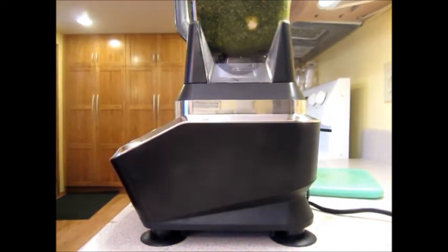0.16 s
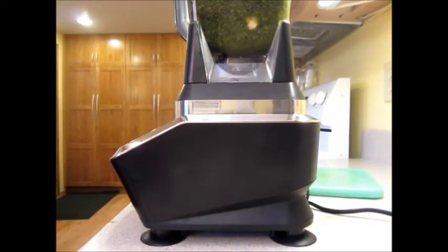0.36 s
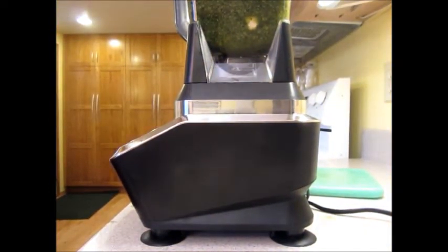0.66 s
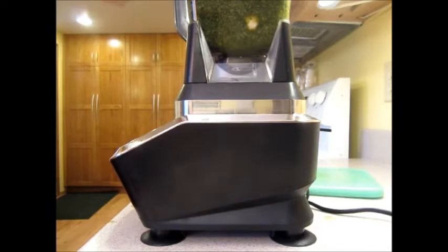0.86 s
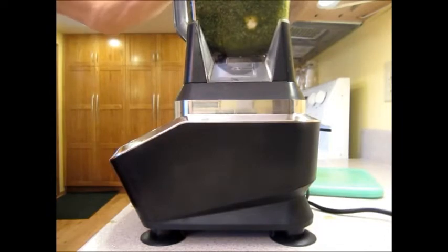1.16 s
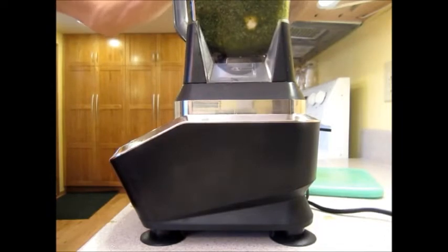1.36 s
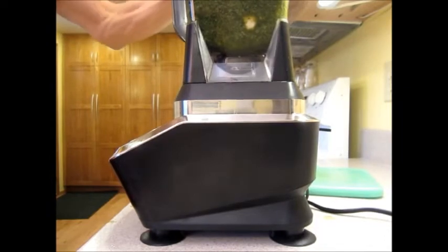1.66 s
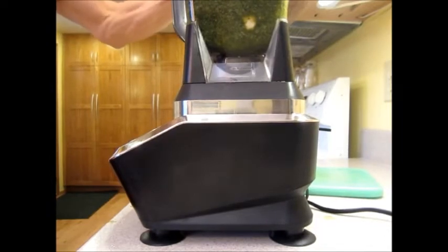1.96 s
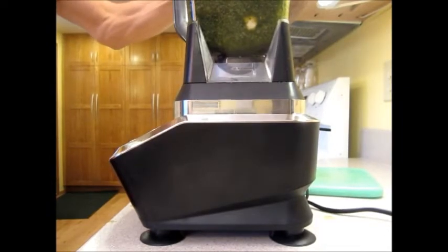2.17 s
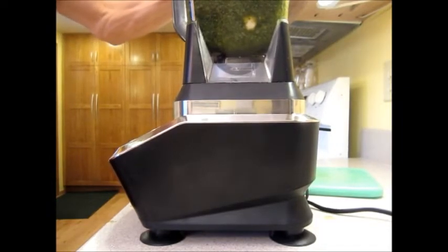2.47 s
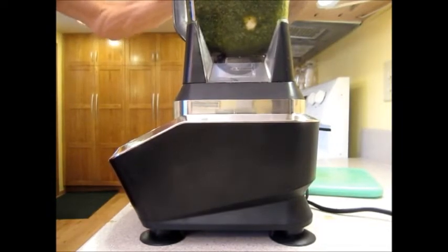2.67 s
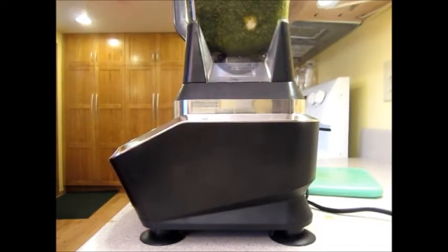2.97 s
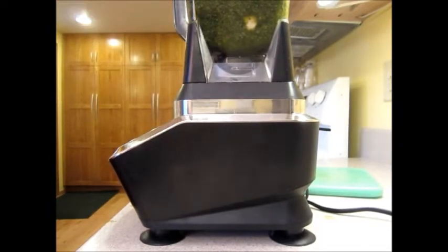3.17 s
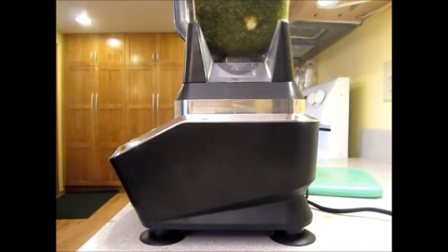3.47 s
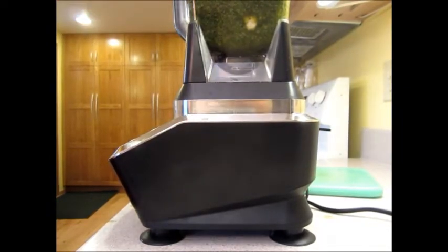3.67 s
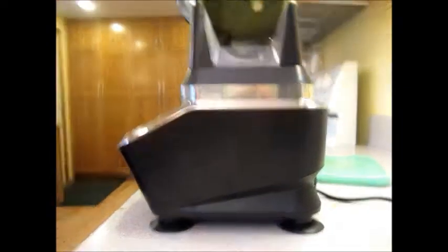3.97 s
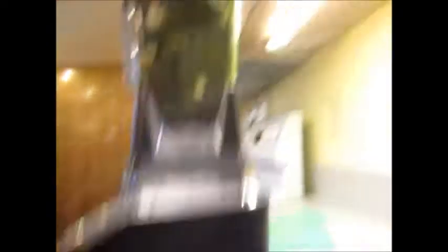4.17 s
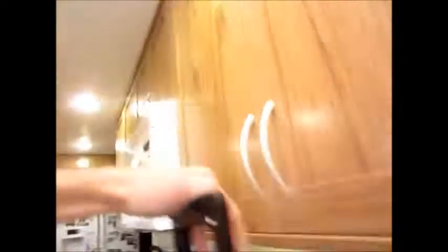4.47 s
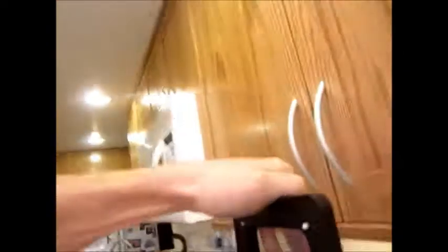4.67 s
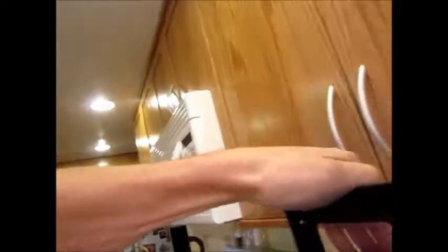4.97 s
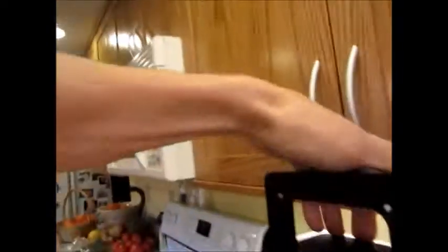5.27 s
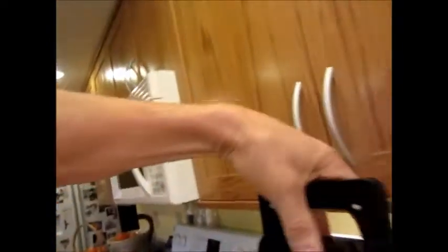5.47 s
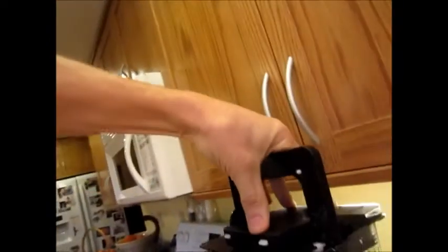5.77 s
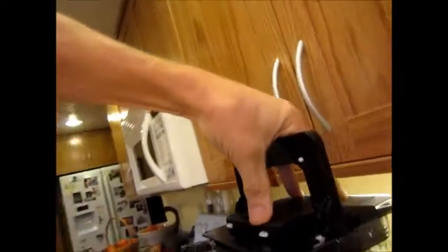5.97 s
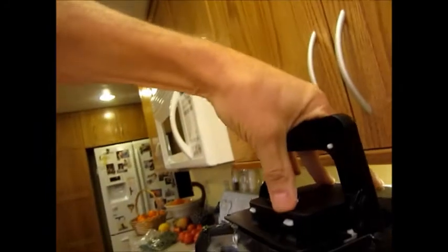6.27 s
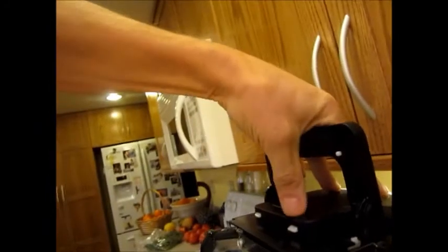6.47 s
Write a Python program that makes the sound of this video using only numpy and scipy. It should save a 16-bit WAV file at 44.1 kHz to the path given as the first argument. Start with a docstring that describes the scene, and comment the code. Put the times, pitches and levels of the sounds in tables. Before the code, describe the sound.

A silent blender's full plastic jar is handled in a hard, reflective kitchen, heard close over soft low hum and hiss, with a barely audible high whine until 4.1 s. A small tick precedes a loud snap at 0.12 s. From 0.4 to 1.5 s, hollow knocks and rattles crowd together with gritty, swelling rubs and a hollow resonance, the biggest clack at 1.07 s. Smaller knocks and low thuds continue, with another loud clack at 2.16 s, then sparser taps and a sharp crack at 2.97 s. Soft rustling follows. From 3.7 to 4.4 s fingers grip and lift the microphone: dry scuffs, low bumps, snaps and a tiny squeak at 4.2 s. A heavy clack lands at 4.47 s, then near quiet. Drier, brighter lid snaps come around 5.35 to 5.4 s, the loudest, and at 6.0 s, ending with faint small clicks around 6.45 s.

```python
"""A hand works a plastic lid and tamper on the full jar of a silent blender in a hard kitchen: knocks and snaps
are noise bursts that ring the jar's modes and a room tail, rubbing is gritty noise that swells with each push.
Brief dry swells of shaped noise run from a tick at 0.108 s on, densest from 3.7 to 4.4 s, where one squeaks;
there fingers grip and lift the microphone, and the knocks turn drier. Low thuds and rumble reach the microphone
over hum and hiss; a faint high tone stops at 4.1 s."""
import sys
import numpy as np
from scipy.fft import rfft, irfft, next_fast_len
from scipy.io import wavfile
from scipy.ndimage import uniform_filter1d, map_coordinates

SR = 44100
rng = np.random.default_rng(int(sys.argv[2]) if len(sys.argv) > 2 else 0)


def waveform_to_disk(signal):
    """Save audio, clipped to [-1, 1], as 16-bit WAV at the path in sys.argv[1]."""
    frames = np.transpose(np.atleast_2d(signal))
    scaled = np.clip(frames, -1, 1) * 32767
    samples = np.round(scaled).astype(np.int16)
    wavfile.write(sys.argv[1], SR, samples)


N = 291921  # samples

# resonances of jar and lid: pitch_hz [Hz], width_hz [Hz], strength_db [dB]
JAR_MODES = [(460, 39, 1), (550.5, 31, -5.5), (647.4, 65, 0), (740, 51, -3.5), (924, 71, -4),
             (1154, 110, -2.5), (1310, 87, 0), (1427, 67, -1), (1580, 98, -4.5), (1816, 56, -7),
             (2410, 260, -8.5), (2786, 120, -2.5), (3160, 240, -4), (3614, 70, -7.5), (4300, 620, -4),
             (4920, 240, -8), (5464, 200, -9), (5790, 110, -6), (6800, 130, -13), (8470, 230, -12.5),
             (9340, 190, -13.5), (10000, 180, -9.5), (11100, 240, -13.5)]
# boom, wall, snap and tick of a contact: centre_hz [Hz], room_t60_s [s to decay by 60 dB]
CONTACT_PARTS = [(600, 0.37), (1500, .36), (4200, 0.31), (10000, 0.2)]


def amp(db):
    """Gain of a level in dB."""
    return 10 ** (np.asarray(db) / 20)


def unit(x):
    """Scaled to rms 1."""
    return x / np.sqrt(np.mean(x ** 2) + 1e-20)


def along(points, hz):
    """Value at each frequency, read between (Hz, value) points on a log axis."""
    f, v = np.transpose(points)
    return np.interp(np.log(hz + 1), np.log(f + 1), v)


def filtered(x, response):
    """x shaped along its last axis by a complex response of frequency."""
    n = x.shape[-1]
    m = next_fast_len(n + 2048)
    spectrum = rfft(x, m) * response(np.fft.rfftfreq(m, 1 / SR))
    return irfft(spectrum, m)[..., :n]


def wobble(rate):
    """A smooth random curve through rate knots a second."""
    knots = rng.standard_normal(int(N * rate / SR) + 4)
    return map_coordinates(knots, [np.arange(N) * rate / SR])


def gritty(size, grit_db):
    """Noise whose samples scatter in size, as many tiny slips do."""
    slip_size = amp(grit_db * rng.standard_normal(size))
    return unit(rng.standard_normal(size) * slip_size)


def narrow(centre_hz, width_hz):
    """A fuzzy tone of rms 1: noise in a narrow bell around one pitch."""
    return unit(filtered(rng.standard_normal(N), lambda hz: np.exp(-((hz - centre_hz) / width_hz) ** 2)))


def ringing(hz, extra_db, broad_db):
    """Response of the jar: its resonances, each at an extra strength, over a flat response."""
    total = amp(broad_db)
    for k, (pitch_hz, width_hz, db) in enumerate(JAR_MODES):
        damping = 1j * hz * width_hz
        mode = damping / (pitch_hz ** 2 - hz ** 2 + damping)
        total = total + amp(db + extra_db[..., k, None]) * mode
    return total


def part(hz, k):
    """Share of the spectrum that belongs to part k; bass and the extreme treble fall away."""
    peaks = [(centre_hz, i == k) for i, (centre_hz, _) in enumerate(CONTACT_PARTS)]
    return along([(300, 0.006)] + peaks + [(15500, 0.014)], hz)


def near_modes(pitch_hz):
    """Closeness, 0 to 1, of every jar mode to each contact's pitch."""
    reach_oct = 0.079
    octaves = np.log2(np.transpose(JAR_MODES)[0] / pitch_hz[:, None])
    return np.exp(-(octaves / reach_oct) ** 2)


def knocks():
    """Each contact is a short noise burst that rings the jar, and the kitchen answers with a diffuse tail."""
    # contacts: start_s [s], snap_db [dB, peak before the output gain below],
    # boom, wall and tick [each dB over the snap], low_hz and high_hz [Hz], length_ms [ms to decay by 60 dB]
    contacts = [(0.0332, -54, 7.5, 18, -28, 1310, 1730, 13), (0.063, -47.5, 12.5, 11.5, -20, 550, 1640, 21),
                (.1214, -8, -8, 5.5, -19.5, 1580, 3036, 19), (0.4169, -31.5, -2, 6.5, -11, 553, 1820, 13),
                (0.4417, -35.5, 5, 8, -16, 1470, 2240, 30), (.4918, -45.5, 22, 19.5, -18, 1345, 1840, 18),
                (.544, -43, 7, 4.5, 3, 633, 1850, 20), (0.6005, -40.5, 10, 14, -15, 635, 1720, 21),
                (0.6426, -25.5, 8, 12.5, -14, 1275, 3060, 19),
                (0.6592, -33.5, 18.5, 13.5, -5, 620, 1710, 23), (0.6914, -28.5, 9, 13, -38, 1196, 1760, 22),
                (0.7101, -37.5, 14, 13, -3, 557, 1700, 16), (.7414, -37, 0, -8, -12, 600, 1710, 14),
                (0.776, -28.5, 9, 7.5, -26, 1310, 1870, 24), (.8535, -42.5, 11.5, -24, -19, 630, 1710, 16),
                (.9033, -35, 6, -27, -3, 550, 1720, 16), (0.9247, -24, -2.5, -5, -9, 460, 4300, 19),
                (1.046, -20, 6, 1, -7, 696, 4300, 36), (1.067, -8, -3.5, 1, -19, 1096, 1820, 13),
                (1.0853, -24.5, -5, 11, -28, 1170, 1710, 14), (1.099, -23, -7, 7.5, -11, 1190, 1710, 17),
                (1.1205, -35, 11, -4.5, -8, 409, 2710, 16), (1.212, -24.5, 8.5, -1.5, -15.5, 610, 2630, 40),
                (1.261, -28.5, 5.5, 3.5, -9, 1300, 2000, 31),
                (1.3743, -35.5, -11, 4.5, -18, 1530, 1770, 15),
                (1.393, -30, -20, -0.5, -13, 1700, 1760, 16), (1.4055, -32, -19, -7, -2, 1200, 3940, 19),
                (1.511, -41.5, 1, -4, 2.5, 454, 3830, 24), (1.6023, -43, -17, -16, 0, 1220, 4150, 14),
                (1.6196, -43, 6, 6, 0, 468, 1880, 25), (1.667, -33, 4, 7.5, -5, 458, 1720, 27),
                (1.6916, -26.5, 4, 0.5, -8, 730, 3340, 21), (1.7994, -37, 8, 13.5, -8, 1266, 1870, 27),
                (1.82, -33.5, 11.5, 10, 1, 460, 2890, 24), (1.9139, -43.5, 9.5, -13, -1.5, 463, 4380, 18),
                (2.157, -8, -5.5, -9.5, -15.5, 600, 2620, 27),
                (2.1753, -17.5, -22, -29, -40, 460, 4600, 18), (2.3156, -27, 1, 9, -14, 1270, 2630, 26),
                (2.3434, -27.5, 7, 8.5, -37, 1580, 1800, 22), (2.3611, -36, 6.5, 1, -9, 1550, 2480, 36),
                (2.401, -37.5, -17, -33, -0.5, 444, 4340, 28), (2.4673, -38, -14, -17, -12, 439, 4400, 18),
                (2.575, -43, 13, 13, -31, 930, 924, 28), (2.841, -33, -30.5, -11, -2, 641, 4500, 14),
                (2.9497, -31.5, -40, -1, -24, 1320, 4330, 21),
                (2.9733, -7, -14, -6.5, -14.5, 1400, 4970, 13.6), (3.25, -40, 6.5, 4, -9, 470, 924, 35),
                (3.9805, -18.5, -11, -8, -12, 1240, 3350, 9.9), (4.014, -41.5, -2, -4, 0, 439, 1700, 14),
                (4.1114, -26, -33, -21, -3.5, 1310, 4830, 19), (4.2006, -9, -15, -18, -14, 527, 2790, 9.5),
                (4.2819, -19.5, -5.5, -7.5, -6, 1060, 2330, 12), (4.3114, -29, 4, -19, -20, 816, 3980, 20),
                (4.3727, -44, 13.5, -11, -29, 460, 2990, 8.5), (4.469, -8, 1.5, 6, 0.5, 610, 2340, 15.7),
                (5.0833, -49.5, 13.5, 2, -14, 726, 3250, 16), (5.1126, -46, 6, 6.5, -4, 677, 2150, 13),
                (5.2105, -38, 9.5, -1.5, -7, 477, 2400, 14), (5.2335, -34.5, 0.5, -5, -29, 744, 5430, 17),
                (5.3267, -24, -13.5, 2, -15, 1107, 3090, 17.5),
                (5.351, -17, -4.5, -5.5, -8, 1590, 5740, 11),
                (5.3844, -1.5, -26, -13, -11.5, 1650, 5320, 14.3),
                (5.3914, -10.5, -20, -2.5, -13.5, 1580, 5900, 22),
                (5.7506, -59.5, 22, 15.5, -24, 734, 1770, 21), (5.963, -40, -5, -10.5, -8, 458, 5300, 25),
                (6.0002, -5.5, -14, 0, -4.5, 1680, 5500, 13.7),
                (6.32, -48.5, -17, -18, -10, 1430, 5680, 25), (6.351, -59.5, 18, 16, -16, 1310, 1940, 16),
                (6.392, -46, -2, -7, -26, 473, 4920, 11), (6.417, -45.5, -11, -17, -9, 441, 5640, 14),
                (6.4427, -46, 11, 5.5, -8.5, 930, 3020, 23),
                (6.4624, -25.5, -14, -3, -14.5, 1320, 3160, 20),
                (6.576, -49.5, -23, -20, 7, 1190, 6720, 13)]
    start_s, snap_db, boom, wall, tick, low_hz, high_hz, length_ms = np.transpose(contacts)
    count = len(start_s)
    lift_s, held_s = 3.7, 4.4  # fingers close on the microphone and lift it; then it is held in the air

    # room over direct sound for a snap of -29 dB: on the counter, lifted, and for the dry taps of gripping fingers
    counter_wet_db, lifted_wet_db, grip_wet_db = -5, -11, -16.5
    wet_db = np.where(start_s < lift_s, counter_wet_db, lifted_wet_db)
    wet_db = np.where((start_s > lift_s) & (start_s < held_s), grip_wet_db, wet_db)
    wet_db = wet_db - 0.0306 * (snap_db + 29)  # hard snaps stand further out of the room

    # a longer contact also rises more slowly
    t = np.arange(3072) / SR
    life_s = length_ms[:, None] / 1000
    envelope = amp(-60 * t / life_s) * (1 - np.exp(-t / (0.066 * life_s)))
    burst = rng.standard_normal((count, len(t))) * envelope

    # the struck spot favours the modes near its two pitches
    favour_db = 15 * np.maximum(near_modes(low_hz), near_modes(high_hz))
    favour_db += 3 * rng.standard_normal((count, len(JAR_MODES)))
    lead = 64  # samples of space before the contact
    padded = np.pad(burst, ((0, 0), (lead, 1500)))
    rung = filtered(padded, lambda hz: ringing(hz, favour_db, broad_db=-10))

    # the room mixes all directions, which blurs the modes a little
    late = np.arange(18000) / SR
    room_noise = rng.standard_normal((count, len(late)))
    diffuse = filtered(room_noise, lambda hz: ringing(hz, 0.7 * favour_db, broad_db=-8))
    buildup = 1 - np.exp(-late / 0.0019)  # echoes gather over a few milliseconds

    rows = np.zeros((count, len(late)))
    for k, over_db in enumerate([boom, wall, 0 * start_s, tick]):
        direct = filtered(rung, lambda hz: part(hz, k))
        peak = uniform_filter1d(np.abs(direct), size=40).max(1, keepdims=True)  # of a 0.9 ms average
        direct *= amp(snap_db + over_db)[:, None] / peak
        room_t60_s = CONTACT_PARTS[k][1]
        tail = filtered(diffuse, lambda hz: part(hz, k)) * amp(-60 * late / room_t60_s) * buildup
        tail_gain = amp(wet_db) * np.linalg.norm(direct, axis=1) / np.linalg.norm(tail, axis=1)
        rows += tail * tail_gain[:, None]
        rows[:, :direct.shape[1]] += direct

    out = np.zeros(N + SR)
    for start, row in zip(np.round(start_s * SR).astype(int) - lead, rows):
        out[start:start + len(row)] += row
    return amp(-7.5) * out[:N]


def pushes():
    """Level curves in dB of drag, rumble and hum: each push rises and falls at a steady rate in dB."""
    # the hand bears down on the jar or grips the microphone: middle_s [s], drag_db and rumble_db [dB before trim],
    # hum_db [dB, hollow base], rise_s [s to rise by 10 dB; below 0 swaps rise and fall, 0 makes no push]
    push_table = [(.48, -53, -55, -62, 0.9), (.66, -29, -50, -39.5, 0.0642), (.77, -37, -55, -42, .05),
                  (.93, -39, -52, -42, 0.03), (1.07, -33, -47, -41, 0.02),
                  (1.119, -29.5, -34.5, -39, 0.0136), (1.27, -42.5, -41, -48, 0.07),
                  (1.44, -49, -49, -56.5, 0.13), (1.53, -62, -46, -51, .04), (1.69, -31, -38, -36, -0.006),
                  (1.821, -44, -35, -40, 0.02), (1.97, -49.5, -45.5, -53.5, 0.19),
                  (2.18, -43, -37, -47, .03), (2.36, -41.5, -37, -48, 0.0232), (2.58, -62, -57.5, -64, .06),
                  (2.99, -48.5, -48.5, -63, 0.16), (3.13, -45, -63, -75, 0.12),
                  (3.25, -47.5, -58, -57, 0.11), (3.76, -58, -44.5, -90, 0.09),
                  (3.89, -52, -39.5, -95, 0.06), (3.98, -44.5, -38, -90, 0.03),
                  (4.04, -45, -37.5, -90, 0.05), (4.14, -43.5, -44, -90, 0.11),
                  (4.29, -53, -37.5, -90, 0.0566), (4.38, -47, -45.5, -90, 0.09),
                  (4.48, -40, -46, -90.5, 0.09), (5.219, -48, -42, -90, 0), (5.36, -41, -41, -90, .02),
                  (5.5, -53.5, -70, -90, 0.15), (5.78, -70, -48, -90, .025), (6.02, -42.5, -48, -90, 0.04)]
    release = 1.31  # a push lets go this much more slowly than it comes
    t = np.arange(0, N, 64) / SR
    middle_s, *levels, rise_s = np.transpose(push_table)[..., None]
    fall_db = 10 * np.maximum((middle_s - t) / rise_s, (t - middle_s) / (release * rise_s))
    return [np.interp(np.arange(N) / SR, t, (db - fall_db).max(0)) for db in levels]


def rubbing():
    """The hand drags on the jar, its contents rustle, and pushes travel to the microphone as rumble."""
    # level of the rustle: time_s [s], level_db [dB before trim]
    rustle_level = [(0, -55), (.4, -64.5), (.77, -47.5), (1.01, -56.5), (1.25, -49.5), (1.7, -57.5),
                    (1.95, -52.5), (2.5, -56.5), (2.9, -56.5), (3.11, -47.5), (3.35, -60), (3.65, -66.5),
                    (3.89, -49.5), (4.48, -49.5), (4.7, -69), (5.07, -61), (5.4, -52), (5.6, -55),
                    (5.75, -66.5), (5.95, -58), (6.03, -53), (6.16, -72), (6.62, -64)]
    # spectrum of the rustle: pitch_hz [Hz], density_db [relative dB per Hz]
    rustle_spectrum = [(710, -31.5), (1200, -3), (1610, 0.5), (3070, -2.5), (4930, -0.5), (9420, -11.5),
                       (11300, -11.5), (15800, -27.5)]
    # spectrum of the rumble: pitch_hz [Hz], density_db [relative dB per Hz]
    rumble_spectrum = [(12, -45.5), (20, -15.5), (48, -3), (119, -3.5), (208, -8), (252, -11.5), (400, -8),
                       (520, -27.5), (880, -120)]

    push_drag_db, push_rumble_db, hum_db = pushes()
    rustle_db = np.interp(np.arange(N) / SR, *np.transpose(rustle_level))
    # between pushes the resting hand drags and rumbles along with the rustle
    drag_db = np.maximum(push_drag_db, rustle_db - 4)
    rumble_db = np.maximum(push_rumble_db, rustle_db - 5.5)

    even = np.zeros(len(JAR_MODES))  # dB, no mode favoured
    drag = filtered(gritty(N, grit_db=4),
                    lambda hz: ringing(hz, even, broad_db=-9) * (part(hz, 0) + 0.7 * part(hz, 1)))
    rustle = filtered(gritty(N, grit_db=5), lambda hz: amp(along(rustle_spectrum, hz)))
    rumble = filtered(rng.standard_normal(N), lambda hz: amp(along(rumble_spectrum, hz)))
    base_hum = amp(hum_db + 4 * wobble(22)) * narrow(centre_hz=459.4, width_hz=37.5)

    jerk = wobble(30)  # drag and rustle jerk together
    lumps_db = 4 * wobble(20)  # pushes come in separate lumps
    # the last number of each gain is its trim in dB
    drag = amp(drag_db + 3.9 * jerk - 2.0) * unit(drag)
    rustle = amp(rustle_db + 3.3 * jerk + 0.7 * wobble(100) + 1.1) * unit(rustle)
    rumble = amp(rumble_db + lumps_db - 1.0) * unit(rumble)
    return drag + rustle + rumble + base_hum


def thuds():
    """Knocks carried through counter or hand: each is one low, quickly dying sine."""
    # thuds: start_s [s], level_db [dB before rise and decay], pitch_hz [Hz]
    thud_table = [(1.088, -32, 290), (1.122, -36, 130), (1.25, -33, 144), (1.427, -33, 113),
                  (1.692, -34, 80), (1.82, -27.5, 130), (2.158, -27, 196), (2.347, -27, 140),
                  (2.973, -40, 180), (3.748, -36, 88), (3.888, -28, 129), (3.983, -27.5, 114),
                  (4.04, -35, 100), (4.155, -33, 340), (4.2, -33, 330), (4.282, -27, 207),
                  (4.314, -31, 180), (4.372, -36, 200), (4.469, -27, 282), (5.209, -32, 166),
                  (5.351, -33.5, 196), (5.758, -37, 75), (6.001, -40, 127)]
    t60_s, rise_s = 0.06, 0.001
    t = np.arange(SR // 8) / SR
    out = np.zeros(N + SR)
    for start_s, db, pitch_hz in thud_table:
        swing = np.sin(2 * np.pi * pitch_hz * t) * (1 - np.exp(-t / rise_s))
        out[round(start_s * SR):][:len(t)] += amp(db - 60 * t / t60_s) * swing
    return out[:N]


def dry_swells():
    """A dry tick at 0.108 s and brief jerky noise swells, densest from 3.7 to 4.4 s; one squeaks."""
    # swells: middle_s [s], level_db [dB], half_s [s from middle to 1/e], tilt_db [brightness, dB per octave]
    swell_table = [(0.108, -43.5, 0.0055, -9), (.735, -44, 0.023, 8.5), (2.003, -47, 0.033, 1),
                   (2.049, -44, 0.052, 0.5), (2.744, -51, 0.027, 1), (3.739, -41.5, 0.0071, -2.5),
                   (3.766, -30, 0.0092, 0), (3.792, -44, 0.026, -2), (3.896, -34, 0.017, 0.5),
                   (3.924, -35, 0.039, 0), (4.05, -63, 0.011, -6.5), (4.07, -28, 0.022, -0.5),
                   (4.122, -40, 0.027, 1.5), (4.15, -32, 0.015, 2.5), (4.221, -37, 0.032, 4),
                   (4.239, -29, 0.015, 0.5), (4.296, -30, .02, 1.5), (4.316, -38.5, 0.0087, 1),
                   (4.358, -50.5, .04, -2.5), (5.159, -53.5, 0.026, 3), (5.223, -50, 0.041, 5.5),
                   (5.817, -53.5, 0.016, -1)]
    # spectrum of the swells before tilt: pitch_hz [Hz], density_db [relative dB per Hz]
    swell_spectrum = [(180, -48), (300, -27.5), (432, -7.5), (688, -14), (772, -8.5), (1710, -8),
                      (1920, -6.5), (3550, -4.5), (12700, -12.5), (15800, -26.5)]
    time_s = np.arange(N) / SR
    out = np.zeros(N)
    jerk = amp(1.3 * wobble(150))
    for middle_s, db, half_s, tilt_db in swell_table:
        span = slice(round((middle_s - 3 * half_s) * SR), round((middle_s + 3 * half_s) * SR))
        t = time_s[span]
        grit = filtered(gritty(len(t), grit_db=3),
                        lambda hz: amp(along(swell_spectrum, hz) + tilt_db * np.log2(hz / 4000 + 1e-3)))
        swell = np.exp(-((t - middle_s) / half_s) ** 2)
        out[span] += amp(db) * unit(grit * jerk[span]) * swell
    squeak_s, squeak_db, squeak_half_s = 4.235, -35, 0.008
    squeak_swell = np.exp(-((time_s - squeak_s) / squeak_half_s) ** 2)
    return out + amp(squeak_db) * narrow(centre_hz=6200, width_hz=150) * squeak_swell


def background():
    """Room hum and microphone hiss as one shaped noise, with a faint fuzzy high tone that stops at 4.1 s."""
    # spectrum of hum and hiss: pitch_hz [Hz], density_db [relative dB per Hz]
    hiss_spectrum = [(15, -18.5), (25, 3), (84, 1.5), (211, -8.5), (261, -4.5), (352, -9.5), (637, -11.5),
                     (1040, -10), (1360, -19.5), (1820, -17.5), (7830, -23.5), (13100, -28.5),
                     (15800, -37.5)]
    hiss_db, whine_db, whine_end_s = -58.75, -75, 4.1
    hiss = filtered(rng.standard_normal(N), lambda hz: amp(along(hiss_spectrum, hz)))
    whine = narrow(centre_hz=7860, width_hz=40) * (np.arange(N) / SR < whine_end_s)
    return amp(hiss_db) * unit(hiss) + amp(whine_db) * whine


def scene():
    """Everything the one microphone hears."""
    return (knocks() + rubbing() + thuds() + dry_swells() + background())[None]


def record(dry):
    """The loudest snaps clip softly; nothing is kept above the band limit."""
    top_hz = 15900
    clipped = dry / (1 + np.abs(dry) ** 6) ** (1 / 6)
    return filtered(clipped, lambda hz: hz < top_hz)


dry = scene()
out = record(dry)
waveform_to_disk(out)
```